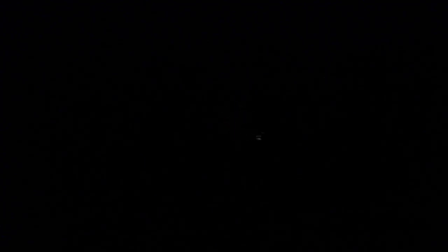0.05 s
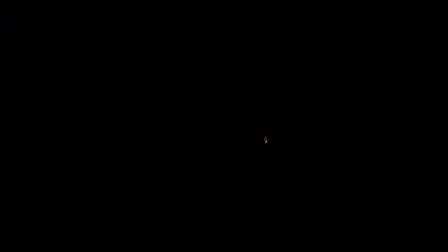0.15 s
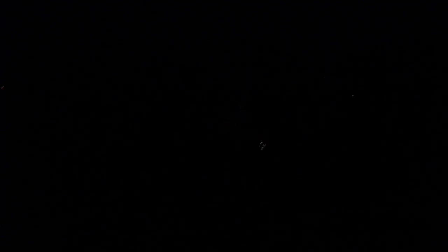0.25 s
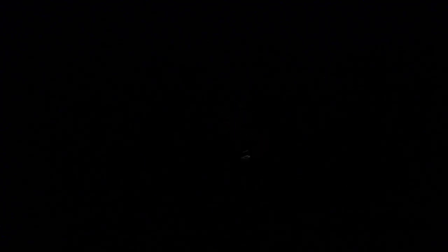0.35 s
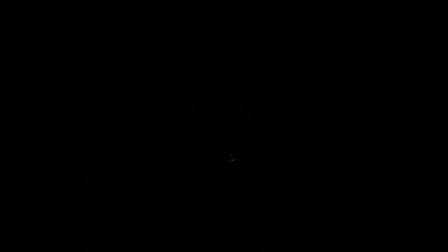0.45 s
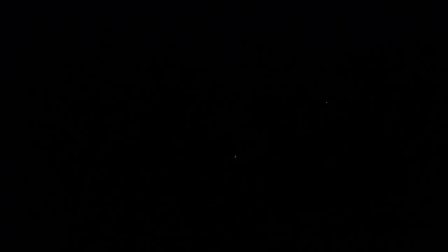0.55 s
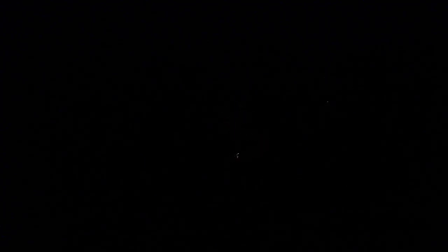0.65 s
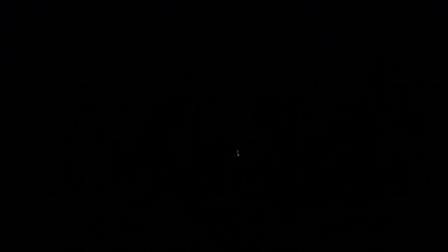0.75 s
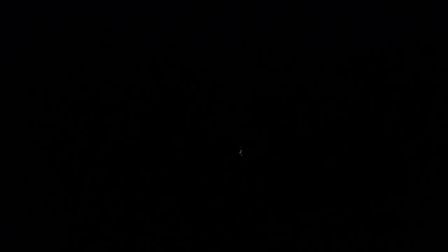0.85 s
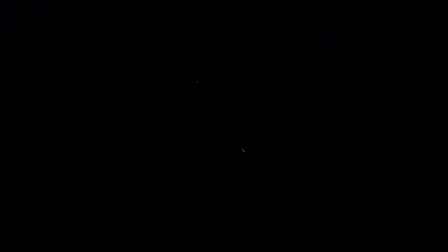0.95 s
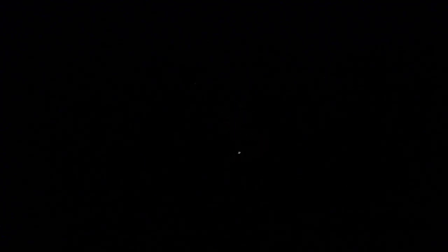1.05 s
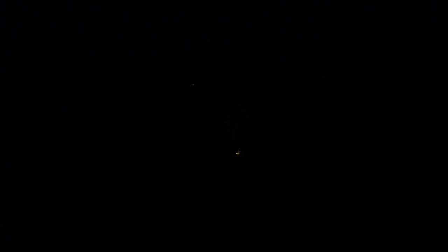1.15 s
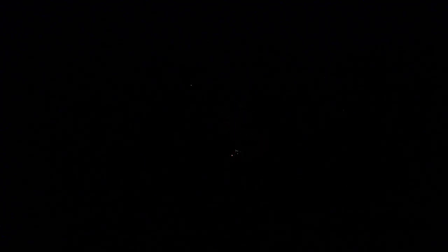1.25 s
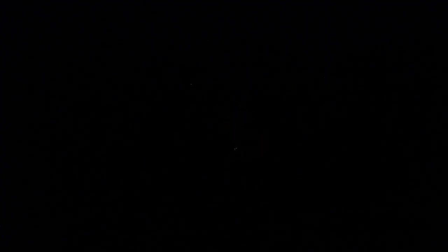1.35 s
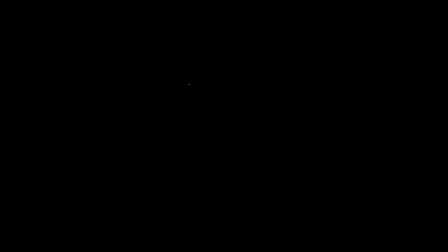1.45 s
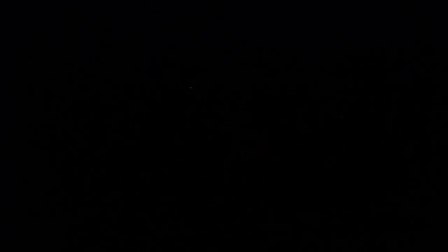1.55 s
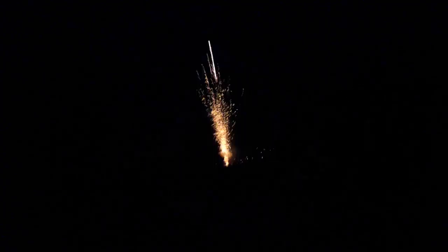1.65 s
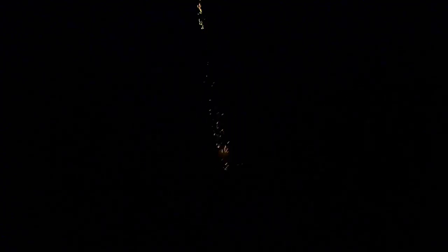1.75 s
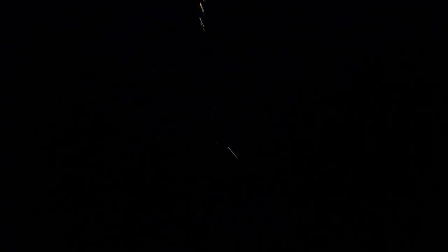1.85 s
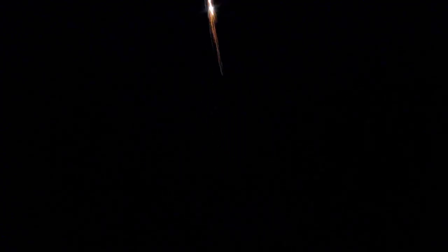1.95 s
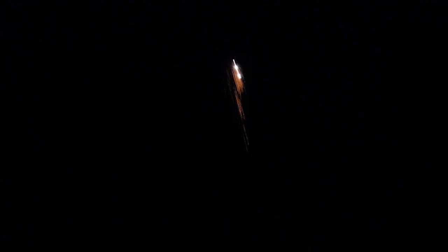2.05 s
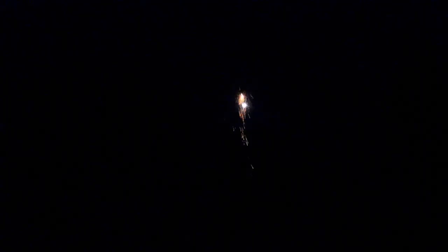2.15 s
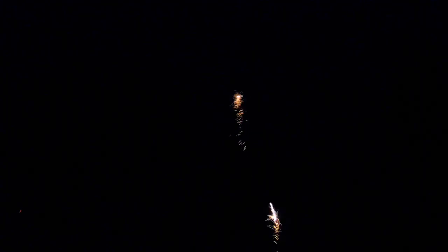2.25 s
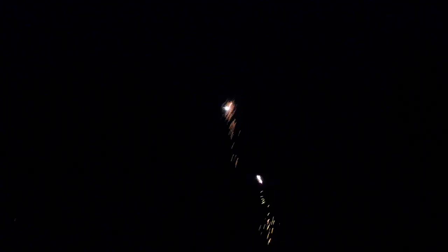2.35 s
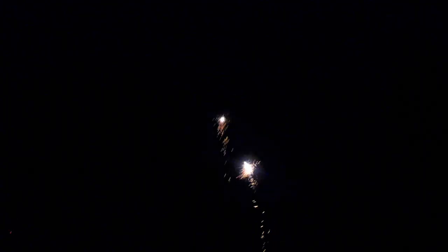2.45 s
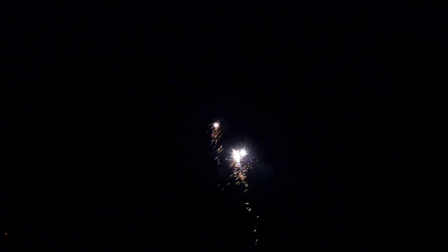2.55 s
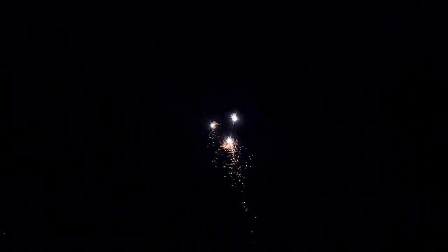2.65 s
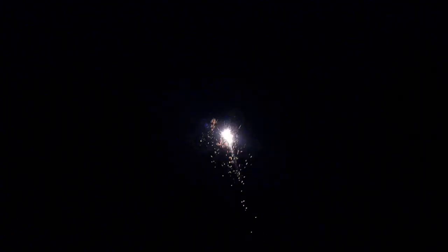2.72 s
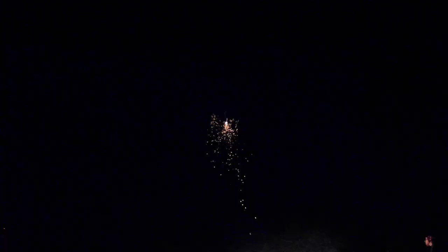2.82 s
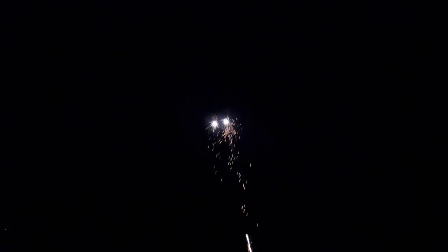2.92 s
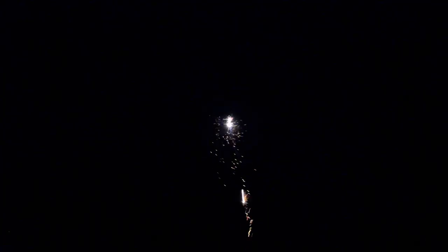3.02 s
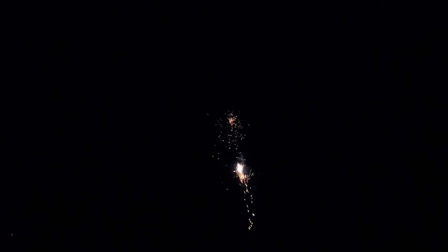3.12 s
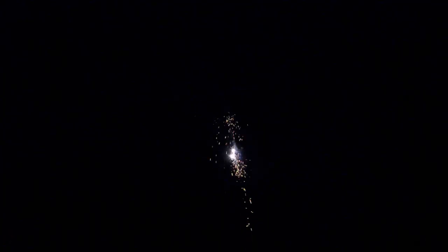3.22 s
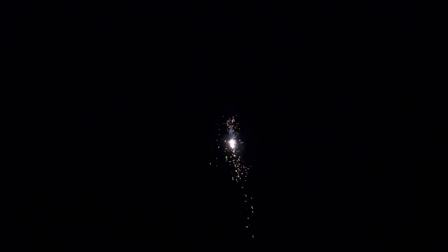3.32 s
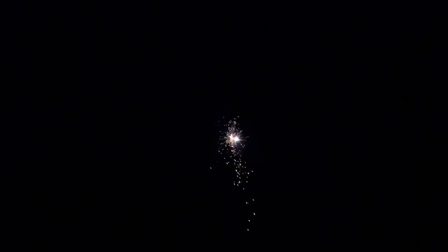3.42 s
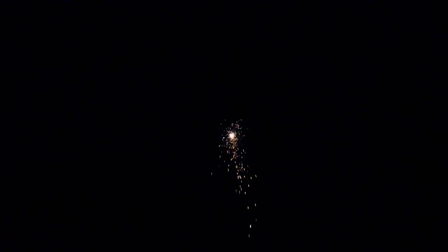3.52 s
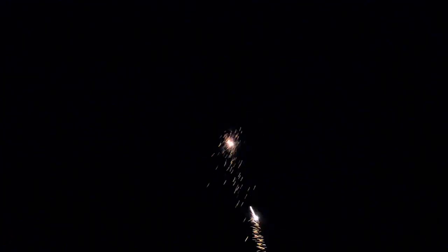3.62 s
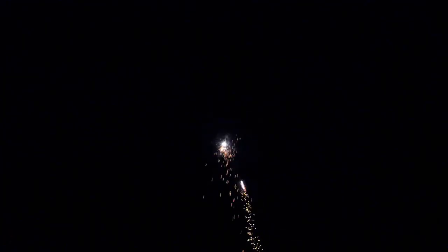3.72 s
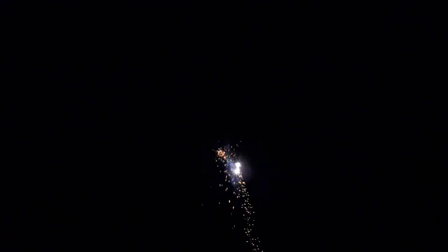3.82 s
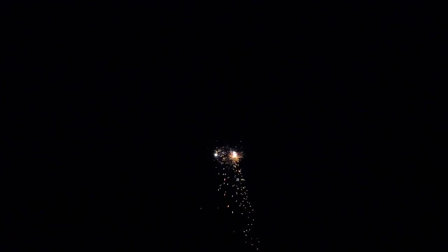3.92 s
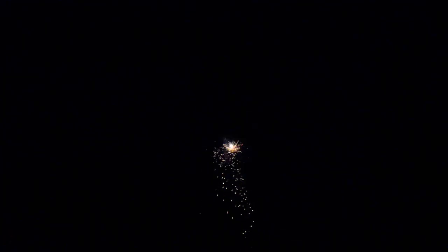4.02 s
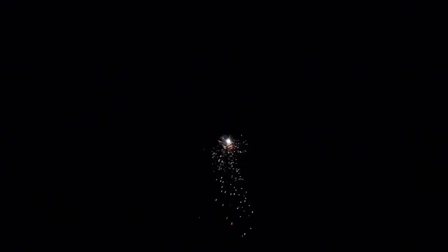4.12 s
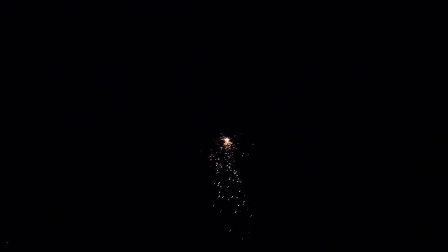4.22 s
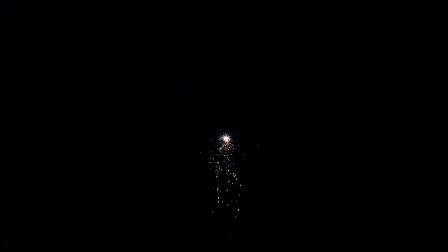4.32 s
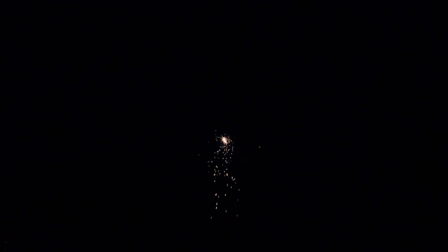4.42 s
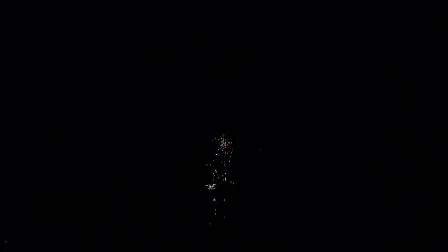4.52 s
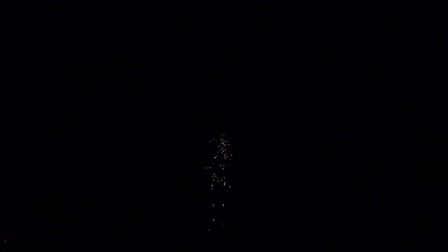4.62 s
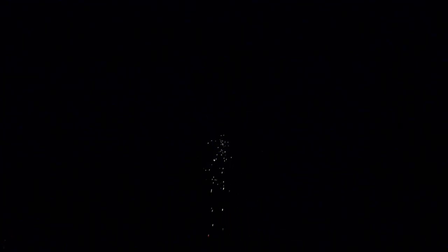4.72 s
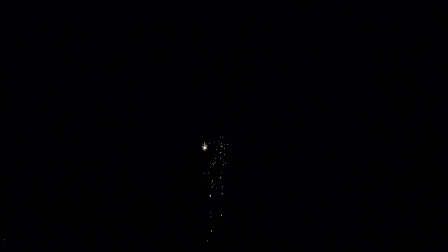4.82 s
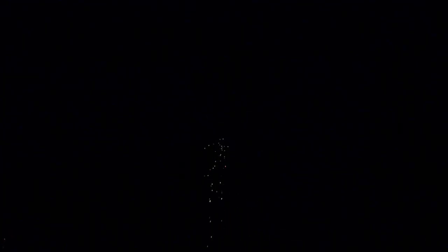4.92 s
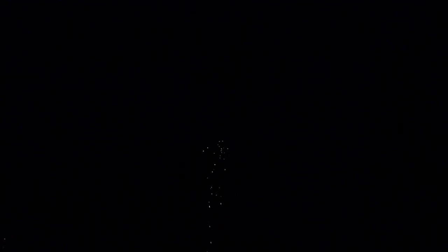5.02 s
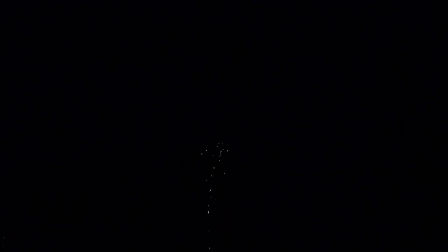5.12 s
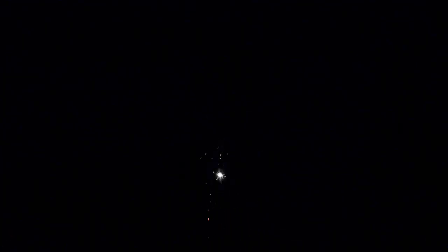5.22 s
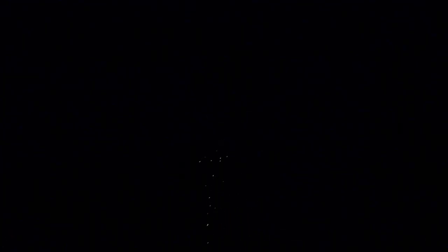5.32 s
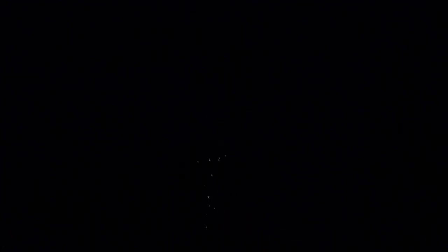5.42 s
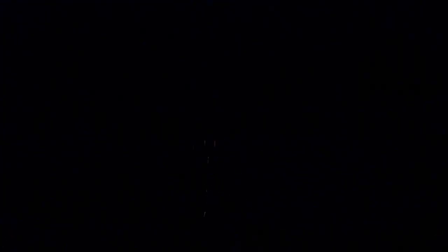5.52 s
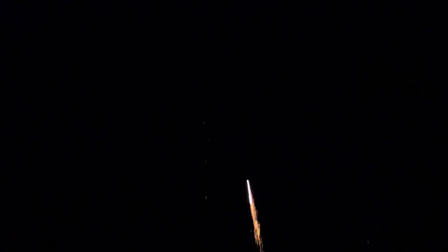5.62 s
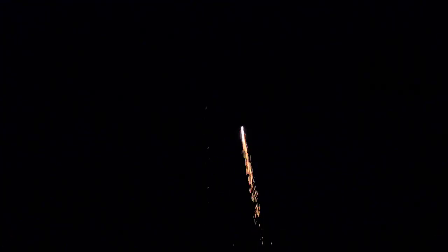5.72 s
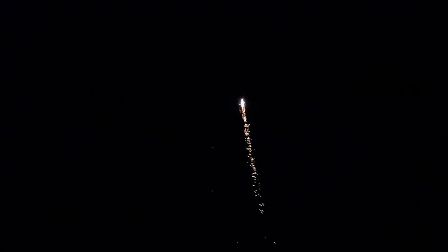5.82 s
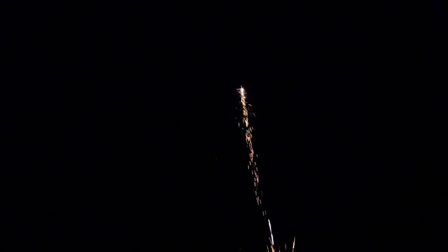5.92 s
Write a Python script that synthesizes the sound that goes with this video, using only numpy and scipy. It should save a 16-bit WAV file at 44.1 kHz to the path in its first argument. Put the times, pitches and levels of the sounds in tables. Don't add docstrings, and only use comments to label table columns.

```python
import sys
import numpy as np
from scipy import signal
from scipy.io import wavfile
from scipy.ndimage import uniform_filter1d

SR = 44100
rng = np.random.default_rng(int(sys.argv[2]) if len(sys.argv) > 2 else 0)


def amplitude_ratio(level_db):
    exponent = np.asarray(level_db, float) / 20
    return 10 ** exponent


def persist_wave(psi):
    counts = np.round(np.clip(psi, -1, 1) * 32767).astype(np.int16)
    wavfile.write(sys.argv[1], SR, np.atleast_2d(counts).T)


N = 262836

# ring in Hz, width in Hz, level in dB, sign and size.
HOUSING = [(1305, 204, -30, 0.31), (1686, 674, -19, 1), (3544, 325, -29.5, -1.267), (5200, 470, -37, 0.9),
           (6800, 410, -37, -0.52), (9060, 930, -26.5, 0.51), (10930, 3100, -24.5, -1.1),
           (12850, 760, -27.5, 0.64), (2380, 8100, -32, 0.78), (14100, 710, -38, -1.1)]
# frequency in Hz, level in dB per Hz.
NIGHT = [(15, -35), (25, -7.5), (92, -5.5), (344, -17), (775, -17.5), (1190, -21), (1440, -15), (1560, -20),
         (16000, -61)]
# start in seconds, peak in dB, blast length in ms, echo smear in ms.
FAR_POPS = [
    (.029, -32, .16, 2),
    (.058, -33, .6, 5),
    (.2164, -36, .12, 3),
    (1.051, -34, .2, 14),
    (1.25, -46, .06, 8),
]
# start in seconds, snap in dB, push in dB, tube pitch in Hz, rattle in ms.
LAUNCHES = [
    (1.5375, 9.5, 3, 145, 1.45),
    (2.0404, 7.5, -1, 181, .68),
    (2.7562, 7, -3.5, 145, 1.2),
    (3.3960, 1.5, -3.5, 164.6, 1.25),
    (5.4017, 2.5, -9.5, 172, 0.665),
    (5.7966, 2, -4, 217, 0.7),
]
# frequency in Hz, time to fall by 60 dB in seconds.
ECHO_T60 = [(100, 0.64), (500, 1), (1500, 0.63), (4000, 0.95), (9000, 0.61), (16000, 0.37)]
# frequency in Hz, level in dB.
GROUND_COLOUR = [(40, 10), (140, 14.5), (300, 4.5), (650, 2.5), (1400, -4), (2500, -2.5), (3600, -8.5),
                 (5000, 1.5), (9000, 0), (16000, -9)]
# frequency in Hz, level in dB.
SKY_COLOUR = [(60, -1), (300, -0.5), (900, 1), (1400, 1), (2600, 4.5), (3500, 0), (4600, 9.5), (7900, 11.5),
              (10400, 7.5), (12500, -5), (16000, 16)]
# start in seconds, peak in dB before overload (same for all stars).
STAR_1 = [(1.7404, -11.5), (1.744, -19), (1.7505, -9.5), (1.8526, -18.5), (1.8757, -23), (1.8818, -10.5),
          (1.9101, 5.5), (1.9186, -31), (1.9475, -3), (1.9574, -8), (2.026, -1), (2.0657, 3), (2.0969, 1.5),
          (2.1454, 2.5), (2.1698, -7), (2.1763, -4), (2.1901, -4.5), (2.1977, -4.5), (2.284, -17),
          (2.3195, -32), (2.344, -1), (2.3637, -5.5), (2.3805, -3.5), (2.4316, -9), (2.4407, 4.5),
          (2.554, 6), (2.5561, 4), (2.5628, 1), (2.625, 5.5), (2.6823, -2)]
# start in seconds, peak in dB.
STAR_2 = [(2.0607, 5), (2.1718, 1.5), (2.1783, -18), (2.2009, -11), (2.2076, -8), (2.3781, 3),
          (2.4076, -3.5), (2.4089, 7.5), (2.4519, 6.5), (2.4694, 12.5), (2.4722, 9.5), (2.5038, -18),
          (2.5064, 9.5), (2.5141, -1), (2.517, 11), (2.5728, 4.5), (2.5883, -2), (2.6009, -2), (2.6091, 4),
          (2.6206, -3.5), (2.6591, 14), (2.6689, -17), (2.674, -2), (2.6903, 6.5), (2.6938, 7), (2.6969, 0),
          (2.7204, -4.5)]
# start in seconds, peak in dB.
STAR_2_HANGING = [(2.8075, -13), (2.8217, 1.5), (2.841, 1), (2.8511, 5), (2.8616, -1), (2.883, 0.5),
                  (2.8983, -4), (2.9092, 4), (2.9337, 3.5), (2.9482, -4), (2.9926, -14), (2.9946, 5.5),
                  (3.0251, -2.5), (3.0362, 5), (3.129, -2), (3.1561, 2.5), (3.2513, 0.5)]
# start in seconds, peak in dB.
STAR_3 = [(2.9711, -4), (3.0331, -1.5), (3.0815, 0), (3.0997, -4), (3.1076, -5), (3.1125, 4), (3.1943, 3),
          (3.199, -6), (3.2122, 2.5), (3.2763, -1), (3.287, -3), (3.2976, 3.5), (3.3241, 1.5), (3.3477, 1),
          (3.3571, -3), (3.3685, 7), (3.388, 3.5), (3.4236, -12), (3.467, 8.5), (3.4724, -7.5),
          (3.5128, -3.5), (3.533, 6), (3.5398, -23), (3.6094, 1), (3.6376, 3), (3.6563, -1), (3.6696, -5),
          (3.6716, -2), (3.7023, 5), (3.7209, -10.5)]
# start in seconds, peak in dB.
STAR_4 = [(3.575, 1), (3.6333, -3), (3.665, 1.5), (3.7917, 8), (3.8459, 4), (3.8675, -10), (3.8687, 3.5),
          (3.8764, -4.5), (3.9288, -0.5), (3.93, -7), (3.942, 1), (3.9487, 2), (3.9571, -2.5),
          (3.9591, -5.5), (3.9694, -4), (3.9975, -8), (4.0023, -7), (4.0208, 8.5)]
# start in seconds, peak in dB.
LAST_EMBERS = [(3.779, 0.5), (3.8133, -2), (3.8201, -1.5), (4.1144, -1), (4.12, -1.5), (4.1505, 0.5),
               (4.1822, 0), (4.2155, -15), (4.2366, -8), (4.2445, -9), (4.2626, -5), (4.2849, -0.5),
               (4.3198, -1), (4.3915, -1.5), (4.4139, -7.5), (4.4354, -6), (4.4827, 11.5), (4.5898, -23),
               (4.6634, 1.7), (4.7967, 7.5), (4.8654, -21), (5.2101, -5), (5.281, -26)]
# start in seconds, peak in dB.
STAR_5 = [(5.5182, -17), (5.7031, -41), (5.7244, -22), (5.747, -31), (5.7613, -23), (5.7871, -20),
          (5.8134, -2), (5.8211, -1.5), (5.8267, -5.5), (5.8584, 1.8), (5.9018, -20), (5.9185, -13.5),
          (5.9257, -7.5)]
# cracks, launch in seconds, bounce delay in ms at the top of the climb.
FLIGHTS = [
    (STAR_1, 1.537, 6.9),
    (STAR_2, 2.041, 6.9),
    (STAR_2_HANGING, 2.1, 6.1),
    (STAR_3, 2.756, 7.1),
    (STAR_4, 3.396, 6.75),
    (LAST_EMBERS, 3.3, 6.55),
    (STAR_5, 5.402, 6.7),
]
# middle in seconds, level in dB, pitch in Hz, length in seconds.
PUFFS = [
    (1.917, -35.5, 46.47, 0.054),
]

NIGHT_DB, HISS_DB = -48, -62
TRAFFIC_S, TRAFFIC_WIDTH_S, TRAFFIC_DB = .95, 0.22, 4
FIRST_CHARGE, LATER_CHARGE = (1.54, -32, 0.1, 12, -9), (0.62, -13.5, 0.1, -1, -26)
QUICK_SWING = (.27, .35)
RUSH_DB, RUSH_PER_PUSH = -4, 0.44
RING_DB_PER_MS = 21.5
VALLEY_DB, VALLEY_T60, VALLEY_HZ = -56, 2.14, 1440
CLIMB_S, CLIMB_MS, LOWEST_MS = 0.2177, 4.8, 4.9
BOUNCE_DB, LOW_LOSS_DB, LOUD_LOSS = -7.5, -16.5, 0.16
SIZE_SPREAD_DB = 1.5
GLANCE, GLANCE_MS = .3, (0.064, .3)
HIGH_HZ, LOW_HZ, DRIFT_S = 6000, 30000, 0.64
ANSWER_DB = -1.35
CLIP = .69


def read(points, hz):
    f, value = np.transpose(points)
    return np.interp(np.log(hz + 1), np.log(f + 1), value)


def add(mix, s, sound):
    part = mix[round(s * SR):][:len(sound)]
    part += sound[:len(part)]


def housing(x):
    t = np.arange(500) / SR
    ring = np.zeros(500)
    for hz, width, db, sign in HOUSING:
        ring += sign * amplitude_ratio(db) * np.exp(-np.pi * width * t) * np.sin(2 * np.pi * hz * t)
    ring[0] += amplitude_ratio(-40)
    return signal.oaconvolve(x, ring)[:len(x)]


def blast(length_ms, ragged_db=-14):
    u = np.arange(400) / SR / (length_ms / 1000)
    wave = -(1 - u) * np.exp(-u)
    front = amplitude_ratio(ragged_db) * rng.standard_normal(400) * np.exp(-u / 2)
    return (wave + front) / abs(housing(wave)).max()


def dull(x, hz):
    return signal.lfilter(*signal.butter(1, min(hz, SR / 2.1), fs=SR), x)


def night():
    frames, hz = N // 256 + 5, np.fft.rfftfreq(1024, 1 / SR)
    a, b, patches = rng.standard_normal((frames, 513, 3)).T
    patches = uniform_filter1d(uniform_filter1d(patches, 10, 0), 16, 1)
    patches_db = 1.44 * patches / patches.std()
    passing = (np.arange(frames) * 256 / SR - TRAFFIC_S) / TRAFFIC_WIDTH_S
    swell_db = TRAFFIC_DB * np.exp(-passing ** 2) - 4.5
    middle = np.exp(-np.log((hz + 1) / 1400) ** 2 / 0.5)[:, None]
    z = (a + 1j * b) * amplitude_ratio(read(NIGHT, hz)[:, None] + patches_db + middle * swell_db)
    noise = signal.istft(z, nperseg=1024, noverlap=768)[1][:N]
    return amplitude_ratio(NIGHT_DB) * noise / noise[:SR].std()


def hiss():
    return amplitude_ratio(HISS_DB) * rng.standard_normal(N)


def far_pops():
    air, t = np.zeros(N), np.arange(2000) / SR
    for s, db, length_ms, smear_ms in FAR_POPS:
        smear = 0.072 * rng.standard_normal(2000) * np.exp(-t / (smear_ms / 1000))
        smear[0] = 1
        add(air, s, amplitude_ratio(db) * np.convolve(blast(length_ms, -np.inf), smear))
    return air


def launches():
    snaps, thumps, muzzle = np.zeros(N), np.zeros(N), np.zeros(N)
    t = np.arange(9000) / SR
    for shot, (s, snap_db, push_db, hz, rattle_ms) in enumerate(LAUNCHES):
        cycles, ring_db, t60, scatter_db, rumble_db = LATER_CHARGE if shot else FIRST_CHARGE
        rush_db = RUSH_DB + RUSH_PER_PUSH * push_db
        snap = amplitude_ratio(snap_db) * blast(0.22)
        for k in range(4):
            add(snaps, s + k * rattle_ms / 1000, amplitude_ratio(-3.5 * k) * snap)

        turns = hz * t + QUICK_SWING[shot > 0] * (1 - np.exp(-t / 0.00024))
        gas = amplitude_ratio(push_db) * np.exp(-(t * hz / cycles) ** 4)
        tube = amplitude_ratio(push_db + ring_db + RING_DB_PER_MS * (rattle_ms - 1.06) - 60 * t / t60)
        slump = amplitude_ratio(push_db - 35) * t / 0.0039 * np.exp(1 - t / 0.0071)
        push = slump - (gas + tube) * np.sin(2 * np.pi * turns)

        rush = amplitude_ratio(rush_db) * dull(rng.standard_normal(9000), hz=1220) * np.exp(-t / 0.007)
        leak = amplitude_ratio(rush_db - 12) * dull(rng.standard_normal(900), hz=1300) * np.exp(-t[899::-1] / 0.0054)
        add(snaps, s - t[900], leak)
        add(snaps, s, 1.68 * rush)
        add(thumps, s, push + 0.22 * rush + 3.54 * dull(rush, hz=483))

        burst = housing(blast(0.21, -np.inf))
        burst += (.006 if shot else .04) * blast(0.85, -np.inf)
        burst += 0.0088 * blast(0.096, -np.inf)
        add(muzzle, s, amplitude_ratio(scatter_db) * burst)
        add(muzzle, s, amplitude_ratio(rumble_db) * np.clip(push, -1, 1) * np.exp(-t / .004))
    before = t[:200] - t[200]
    squeal = amplitude_ratio(6.5) * np.exp(before / 0.00064) * np.cos(2 * np.pi * 1750 * before)
    add(thumps, LAUNCHES[0][0] - t[200], squeal)
    return housing(snaps) + thumps, muzzle


def echoes(shape, colour, count):
    taps = rng.choice([-1., 1.], SR) * (rng.random(SR) < count / SR)
    taps *= amplitude_ratio(3.5 * np.minimum(rng.exponential(1, SR), 4))
    hz, frames, z = signal.stft(taps * shape, SR, nperseg=256)
    z *= amplitude_ratio(read(colour, hz)[:, None] - 60 * frames / read(ECHO_T60, hz)[:, None])
    return signal.istft(z, SR, nperseg=256)[1]


def ground_echoes(x):
    t = np.arange(SR) / SR
    rising = amplitude_ratio(-38.5) * (.6 + .4 * np.clip((t - .035) / .04, 0, 1)) * (t > .004)
    houses = amplitude_ratio(-34) * np.exp(-(abs(t - .085) / .024) ** 1.3) * (t > .072)
    wall = amplitude_ratio(-45) * np.exp(-((t - .031) / 0.0013) ** 2)
    return signal.oaconvolve(x, echoes(rising + houses + wall, GROUND_COLOUR, count=5000))[:N]


def valley(x):
    t = np.arange(2 * SR) / SR
    band = signal.butter(1, [VALLEY_HZ / 1.72, VALLEY_HZ * 1.33], "band", fs=SR)
    tail = signal.lfilter(*band, rng.standard_normal(2 * SR))
    tail *= np.clip(t / 0.15, 0, 1) * amplitude_ratio(VALLEY_DB - 60 * t / VALLEY_T60)
    return signal.oaconvolve(x, tail)[:N]


def cracks():
    air = np.zeros(N)
    for star, launch_s, top_ms in FLIGHTS:
        for s, db in star:
            age = s - launch_s
            low = np.exp(-age / CLIMB_S)
            length_ms = 0.14 * amplitude_ratio(0.018 * db + SIZE_SPREAD_DB * rng.uniform(-0.76, 1))
            wave = amplitude_ratio(db) * blast(length_ms)
            add(wave, rng.uniform(*GLANCE_MS) / 1000, GLANCE * rng.uniform(-1.18, 1) * wave)
            add(air, s, dull(wave, hz=HIGH_HZ + LOW_HZ * np.exp(-age / DRIFT_S)))

            bounce = amplitude_ratio(BOUNCE_DB + LOW_LOSS_DB * min(low, .4) - LOUD_LOSS * db)
            delay_ms = max(top_ms - CLIMB_MS * low, LOWEST_MS)
            add(air, s + delay_ms / 1000, bounce * dull(dull(wave, hz=2640), hz=4120))
    return air


def sky_echoes(x):
    out, clock, t = np.zeros(N), np.arange(N) / SR, np.arange(SR) / SR
    near = amplitude_ratio(-15.0) * np.exp(-t / 0.0042) * np.where(t > .0066, 1, .15) * (t > .0012)
    far = amplitude_ratio(-38.5) * (0.27 + 0.58 * np.clip((t - .035) / 0.023, 0, 1))
    far *= 1 + 0.56 * np.exp(-((t - .075) / 0.035) ** 2)
    for k in range(3):
        tail = echoes(near + far, SKY_COLOUR, count=1300)
        share = np.cos(np.pi * (1.323 * clock + k / 3))
        out += signal.oaconvolve(x * share * amplitude_ratio(ANSWER_DB), tail)[:N]
    add(out, .0327, amplitude_ratio(-23) * dull(x, hz=7000))
    return out


def breeze():
    out, t = np.zeros(N), np.arange(N) / SR
    for s, db, hz, length in PUFFS:
        out += amplitude_ratio(db) * np.exp(-((t - s) / length) ** 2) * np.sin(2 * np.pi * hz * (t - s))
    return out


def scene():
    pops = far_pops()
    background = night() + hiss() + housing(pops) + 0.14 * pops + breeze()
    shots, muzzle = launches()
    stars = housing(cracks())
    near = shots + ground_echoes(muzzle) + stars + sky_echoes(stars)
    return (background + near + valley(stars + amplitude_ratio(-2) * shots))[None]


def roll_off(x):
    return signal.sosfilt(signal.butter(12, 16980, fs=SR, output="sos"), x)


def record(dry):
    flat = np.clip(dry, -CLIP, CLIP)
    sagged = signal.lfilter(*signal.butter(1, 14, "high", fs=SR), flat)
    body_filter = signal.firwin(511, 15800, window=("kaiser", 8), fs=SR)[None]
    top_filter = signal.firwin(511, 16650, window=("kaiser", 8), fs=SR)[None]
    body = signal.oaconvolve(sagged, body_filter, "same")
    top = signal.oaconvolve(sagged - body, top_filter, "same")
    now = uniform_filter1d(top ** 2, size=300)
    before = uniform_filter1d(top ** 2, size=2400, origin=1199)
    sudden = uniform_filter1d(1. * (now > 5.5 * before), size=300)
    mix = body + amplitude_ratio(-9) * np.clip(2 * sudden, 0, 1) * top
    return roll_off(mix)


dry = scene()
out = record(dry)
persist_wave(out)
```